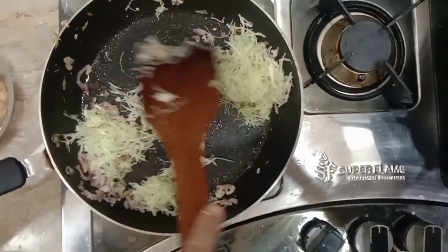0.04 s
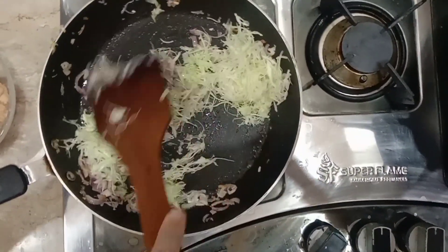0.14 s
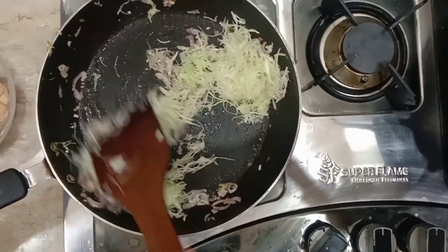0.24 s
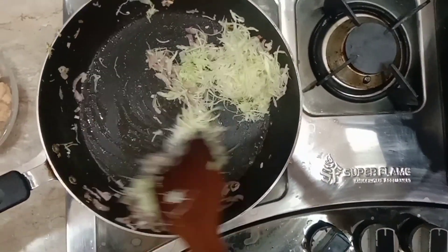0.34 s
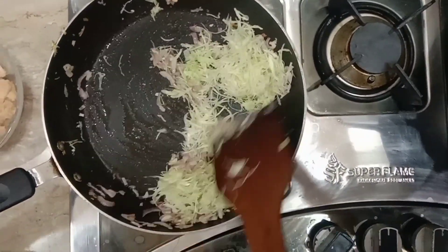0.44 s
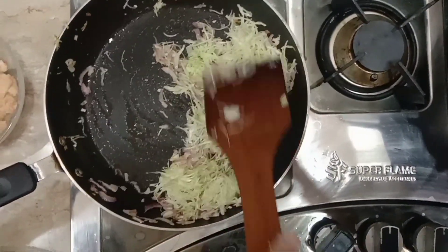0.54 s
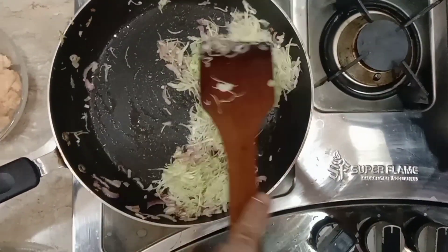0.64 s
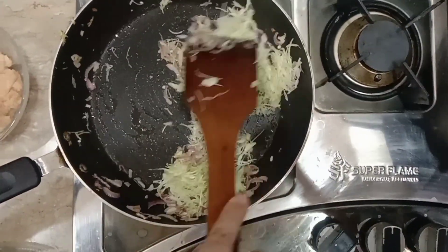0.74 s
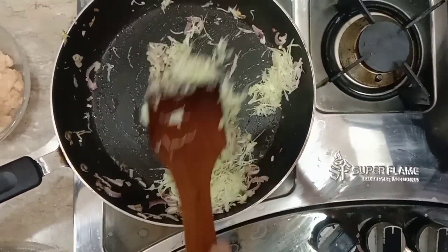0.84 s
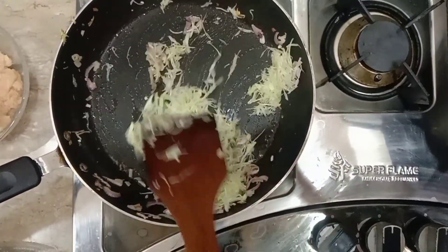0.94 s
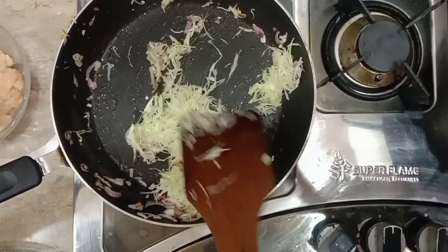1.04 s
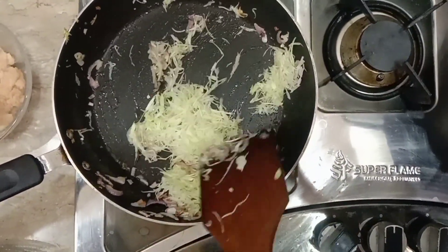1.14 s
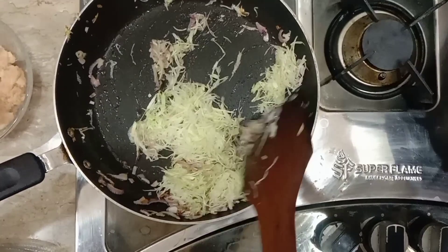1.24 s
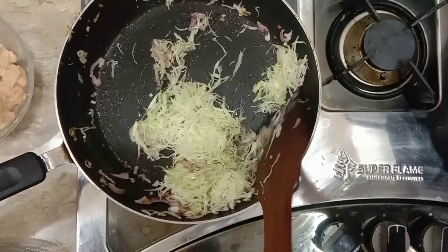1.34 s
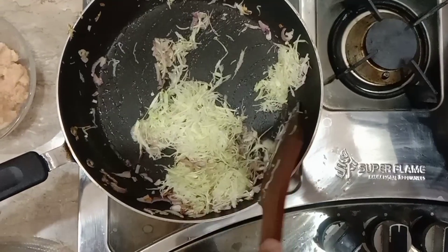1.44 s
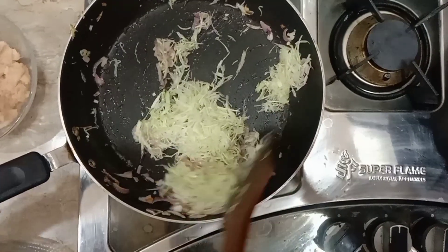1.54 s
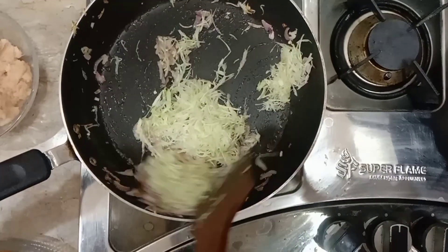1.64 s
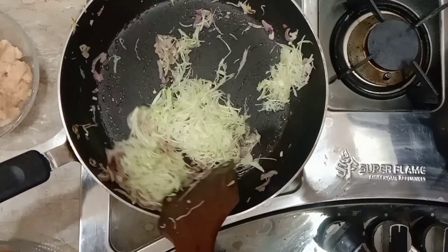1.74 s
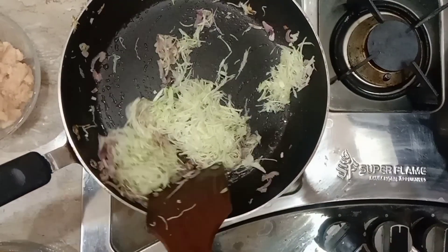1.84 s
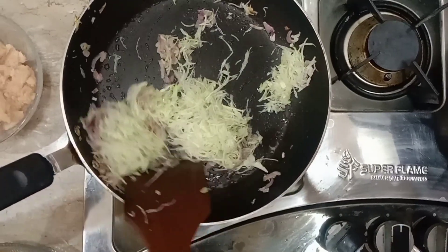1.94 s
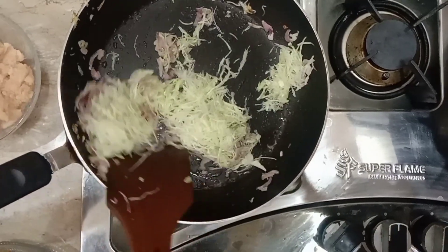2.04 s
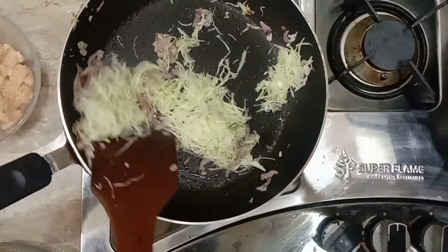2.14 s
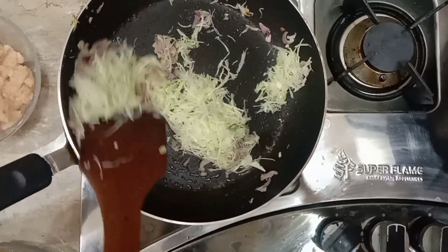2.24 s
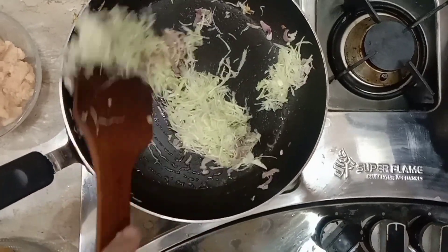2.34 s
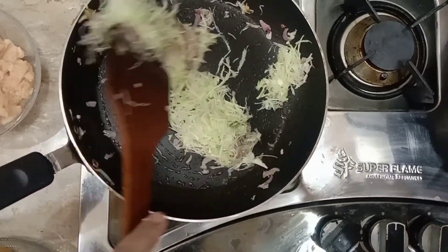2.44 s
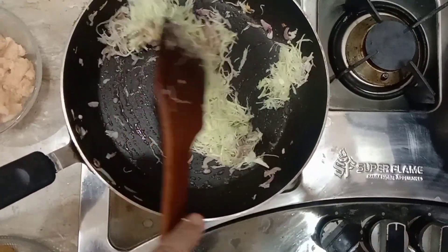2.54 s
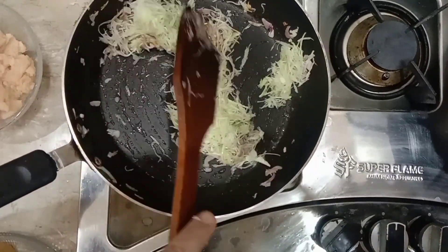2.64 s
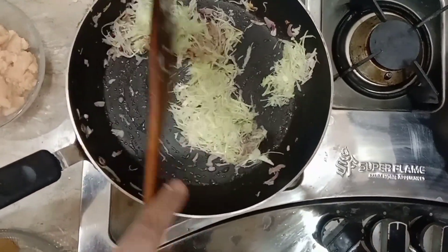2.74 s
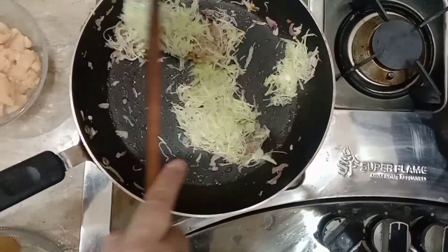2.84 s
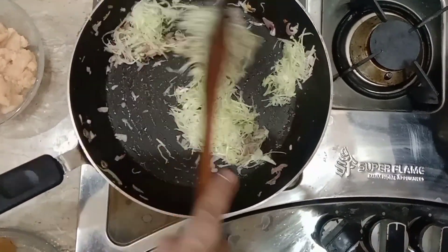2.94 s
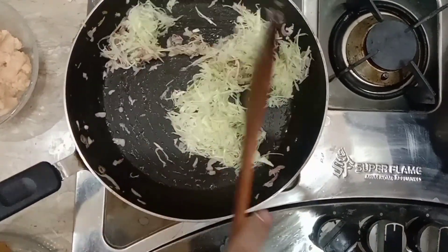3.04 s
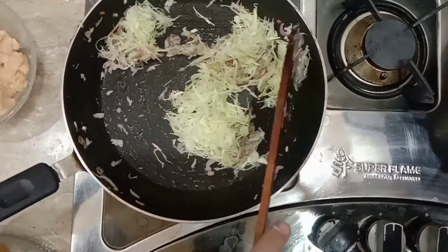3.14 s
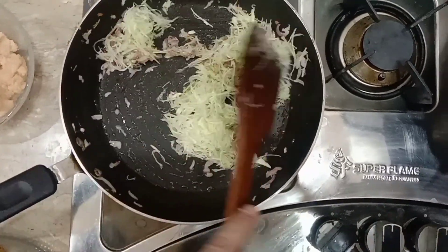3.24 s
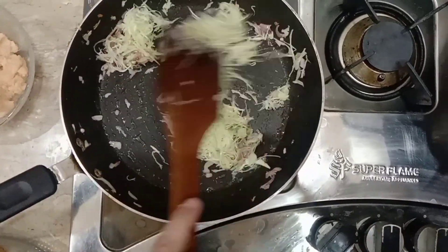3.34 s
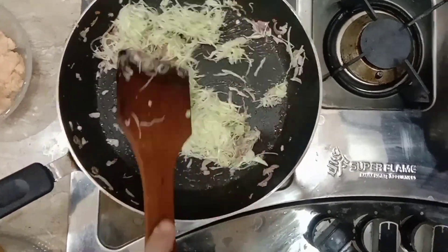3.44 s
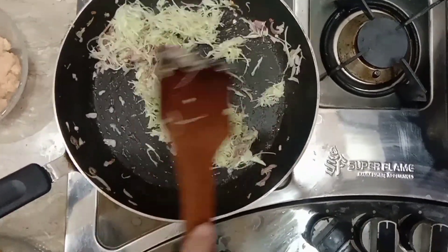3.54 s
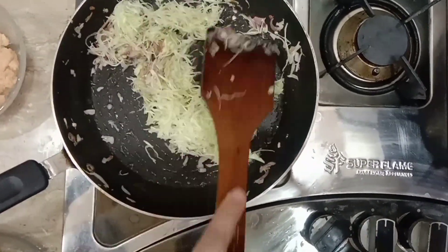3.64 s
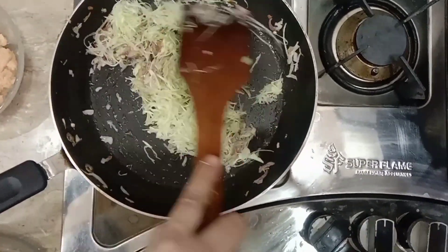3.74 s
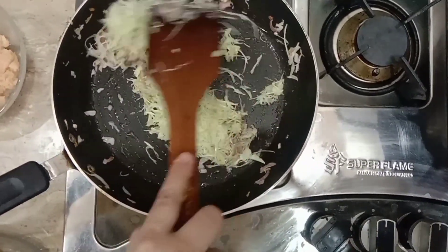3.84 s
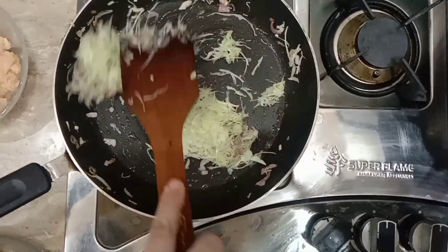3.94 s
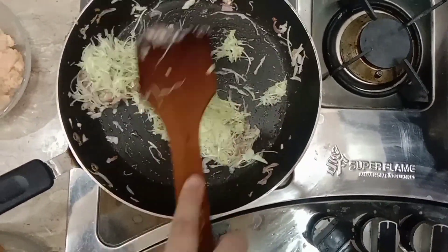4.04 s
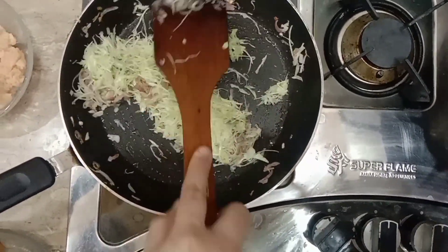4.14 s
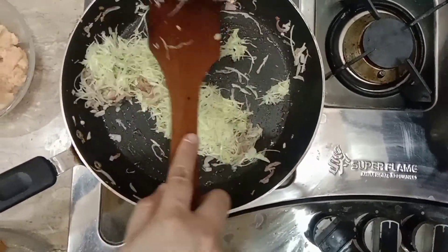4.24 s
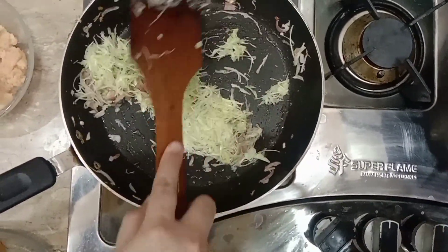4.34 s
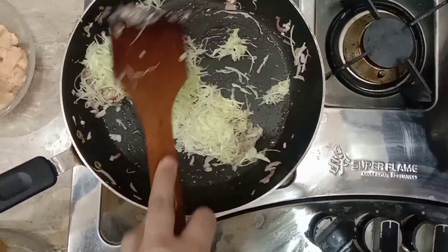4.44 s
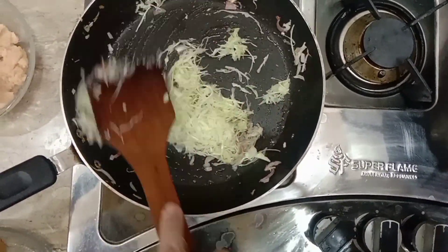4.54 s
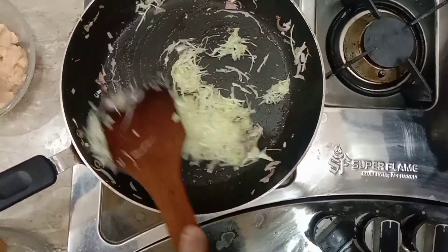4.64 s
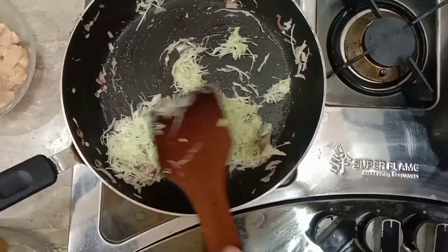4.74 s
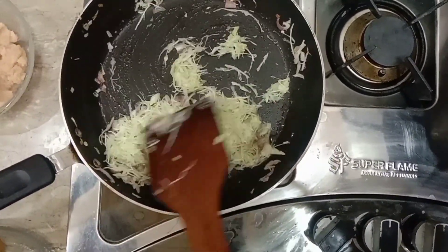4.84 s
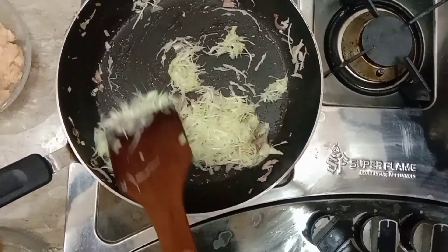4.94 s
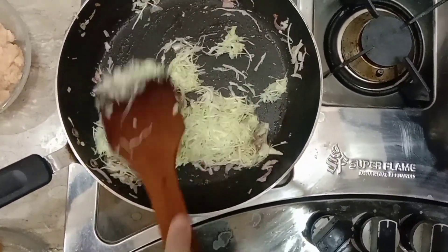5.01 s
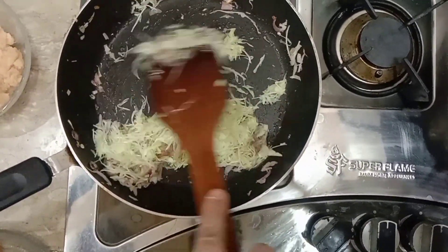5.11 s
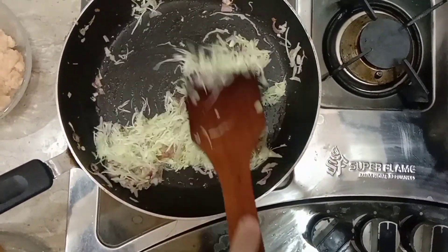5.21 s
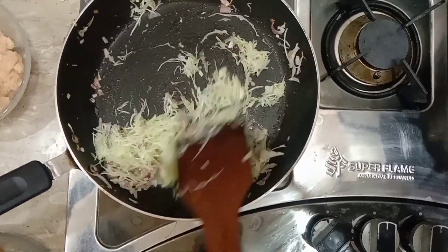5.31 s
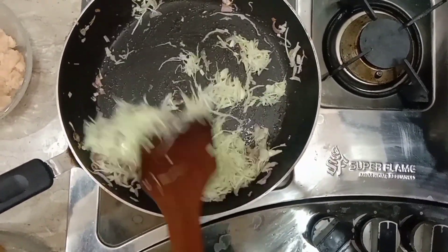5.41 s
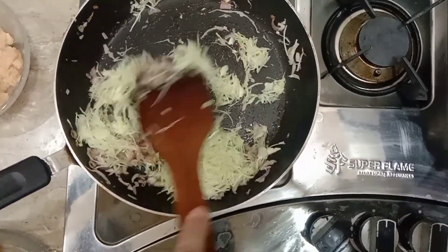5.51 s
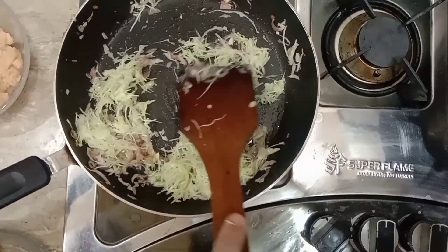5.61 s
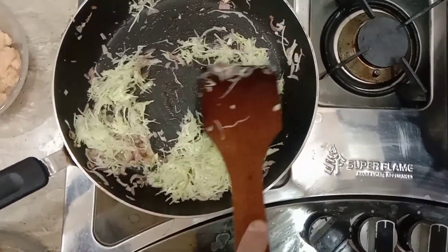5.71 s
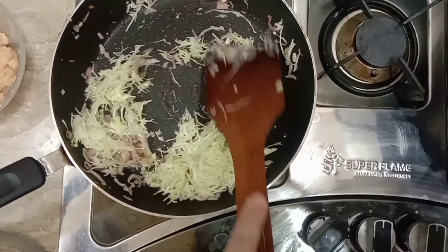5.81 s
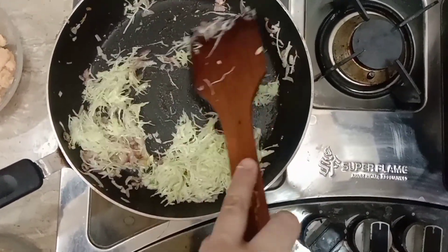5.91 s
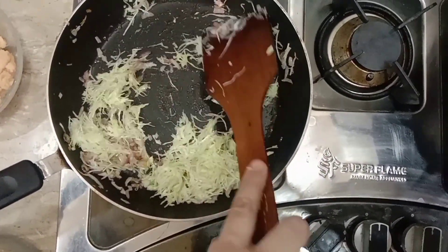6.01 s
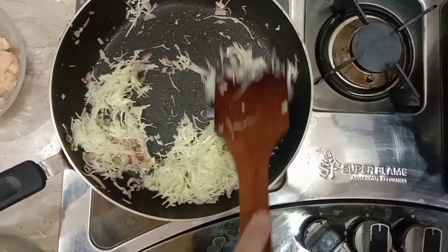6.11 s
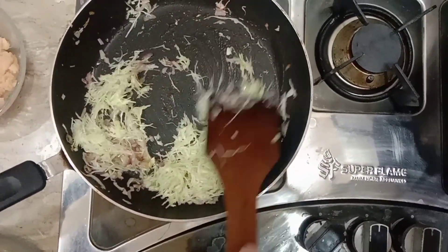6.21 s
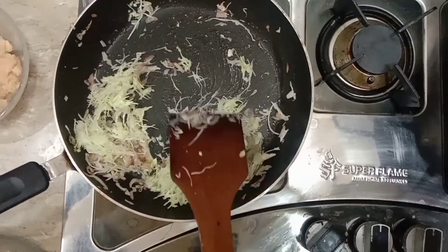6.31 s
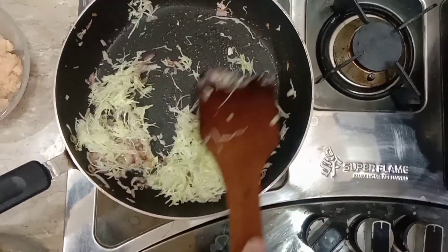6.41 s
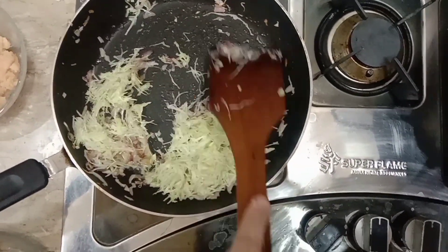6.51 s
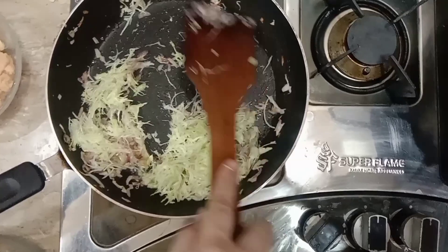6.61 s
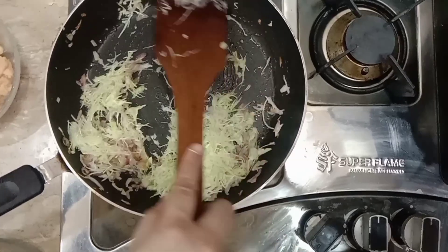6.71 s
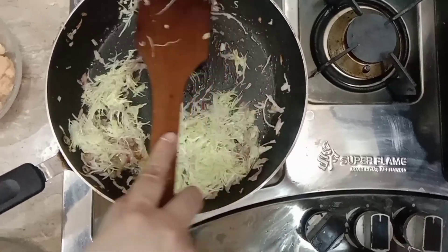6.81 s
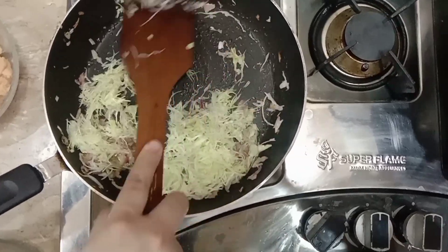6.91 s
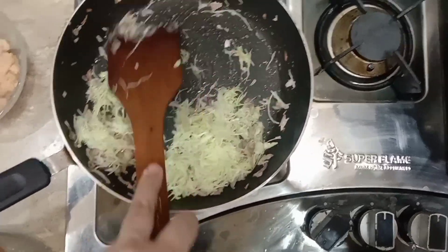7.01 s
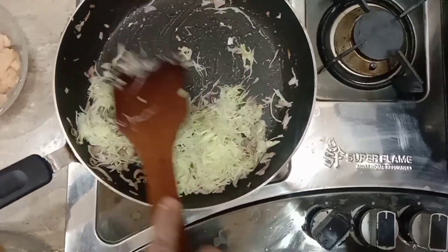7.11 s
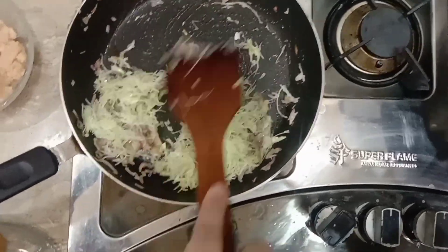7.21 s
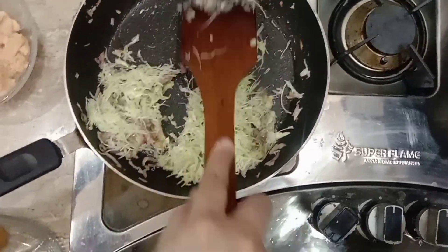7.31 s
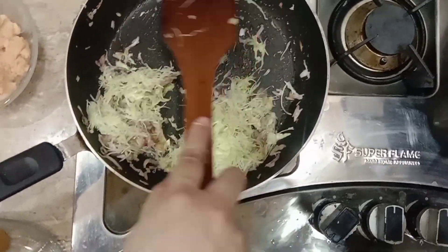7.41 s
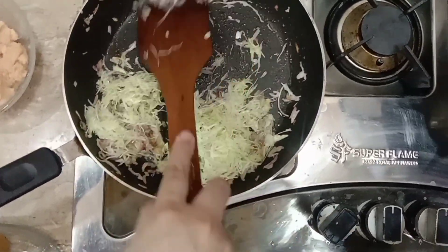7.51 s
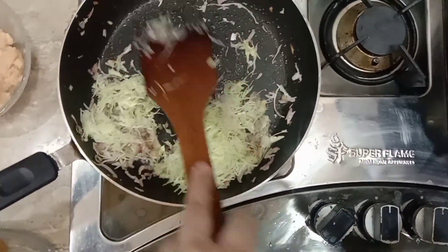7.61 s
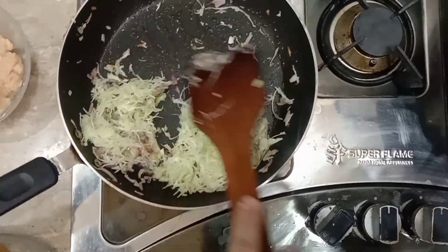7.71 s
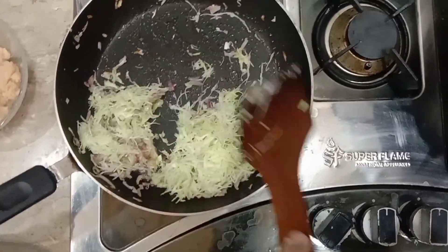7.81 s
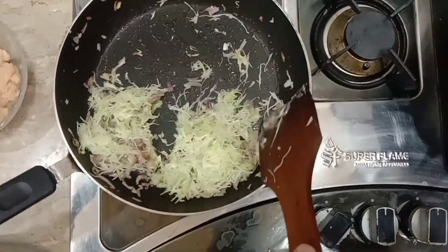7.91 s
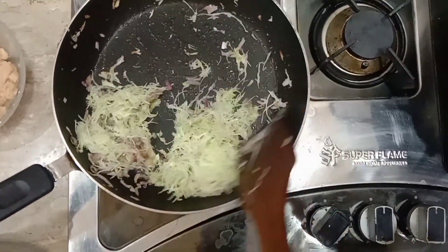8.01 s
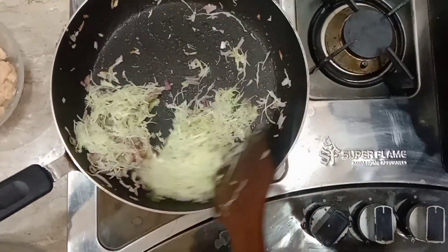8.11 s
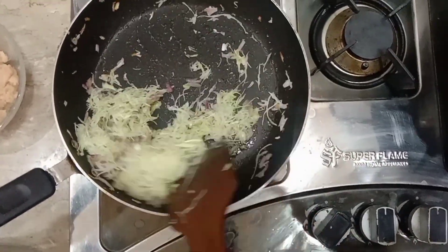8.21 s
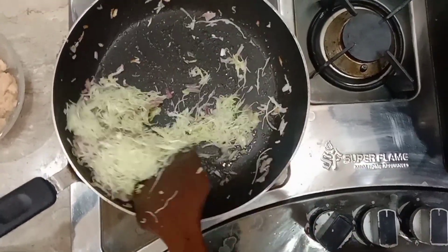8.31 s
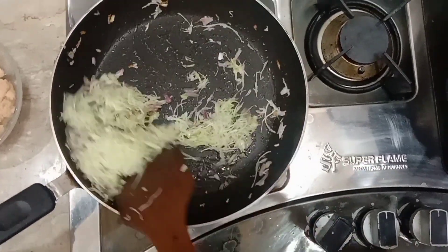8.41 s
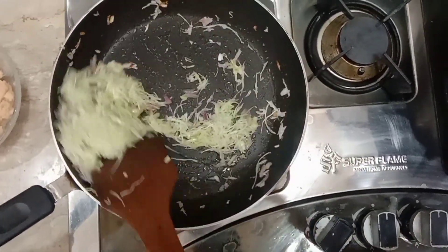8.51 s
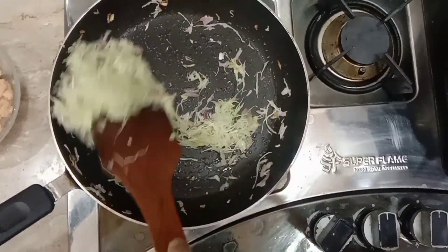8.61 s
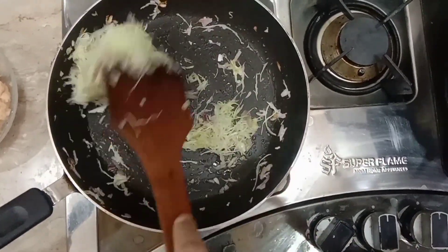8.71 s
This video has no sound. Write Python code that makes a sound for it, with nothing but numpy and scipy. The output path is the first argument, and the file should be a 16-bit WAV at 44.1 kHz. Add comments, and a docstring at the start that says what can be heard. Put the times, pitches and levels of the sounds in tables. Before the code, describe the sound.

Shredded vegetables fry in a coated pan, heard close through a mono phone microphone in a small kitchen. At first only a thin, quiet hiss and faint low rumble. A dull bump comes at 0.55 s, a hollow wooden knock at 0.85, scraping around 1.0 to 1.4, and soft bumps near 1.6. A hard, ringing cluster of taps lands from 2.4 to 2.6. Just before 3 s a broad crackle rises, swelling unevenly through 4 to 5.7 s, with light taps at 3.1 and 3.6 and a firmer knock at 5.4. Around 5.9 s a bright, much louder fizz bursts in and holds, sputtering, with spits near 6.5 and 7.6. A sharp tap rings at 6.1, others at 6.9, 7.3 and 7.6, with dry scrapes from 7.3 to 7.8. The fizz dips near 8.35, surges at 8.6 beside a dull bump, and continues to the end at 8.8.

```python
"""Vegetables frying in a pan

Shredded vegetables fry in a coated pan in a small kitchen, close under a mono phone microphone.
Steam bubbles burst in the oil: patchy noise for a fine hiss, a broad crackle and, later, a bright fizz.
A wooden spatula taps, bumps and scrapes: decaying sines and noise slips ring the pan on its grate.
A low rumble lies beneath; the phone's noise suppressor cuts the bass tails short, band by band."""
import sys
import numpy as np
from scipy import signal
from scipy.fft import rfft, irfft, next_fast_len
from scipy.io import wavfile
from scipy.ndimage import uniform_filter1d, map_coordinates

SR = 44100
rng = np.random.default_rng(int(sys.argv[2]) if len(sys.argv) > 2 else 0)


def to_wav(s):
    """Save 16-bit WAV."""
    ch = np.atleast_2d(s).T  # columns
    pcm = np.round(np.clip(ch, -1, 1) * 32767)  # PCM
    wavfile.write(sys.argv[1], SR, pcm.astype(np.int16))


N = 386316


def amp(db):
    """Decibels to gain."""
    return 10 ** (np.asarray(db) / 20)


def unit(x):
    """Scale to rms 1."""
    return x / np.sqrt(np.mean(x ** 2) + 1e-20)


def peak(x):
    """Scale to peak 1."""
    return x / np.abs(x).max()


def along(points, hz):
    """Interpolate (Hz, value) points on a log frequency axis."""
    point_hz, values = np.transpose(points)
    return np.interp(np.log(hz + 1), np.log(point_hz + 1), values)


def curve(rows):
    """Interpolate (s, dB) rows to one value per sample; -150 dB ahead of the first, the last one held."""
    s, level_db = np.transpose(rows)
    return np.interp(np.arange(N) / SR, s, level_db, left=-150)


def wobble(knots_per_s):
    """A smooth random curve through normally distributed knots."""
    knots = rng.standard_normal(int(N * knots_per_s / SR) + 4)
    return map_coordinates(knots, [np.arange(N) * knots_per_s / SR])


def filtered(x, response):
    """Multiply the spectrum of x by a response of frequency."""
    m = next_fast_len(N + SR // 2)
    return irfft(rfft(x, m) * response(np.fft.rfftfreq(m, 1 / SR)), m)[..., :N]


def below(x, edge_hz, width_hz):
    """The part of x under an edge; the gain falls linearly to 0 over the width."""
    return filtered(x, lambda hz: np.clip((edge_hz - hz) / width_hz, 0, 1))


def bursts(spectrum, spike_db, patchy_db):
    """Dense bursts of exponentially scattered size, in time-frequency patches, coloured, at rms 1."""
    sizes = np.minimum(rng.exponential(size=N), 6)
    z = signal.stft(rng.standard_normal(N) * amp(spike_db * sizes), nperseg=512)[2]
    field = uniform_filter1d(rng.standard_normal(z.shape), size=2, axis=0)
    field = uniform_filter1d(field, size=22, axis=1)
    patched = signal.istft(z * amp(patchy_db * unit(field)), nperseg=512)[1][:N]
    return unit(filtered(patched, lambda hz: amp(along(spectrum, hz))))


def echo():
    """A fresh kitchen tail of unit energy: noise in which each frequency dies at its own speed."""
    # Each row: frequency in Hz, t60 in s.
    decay_t60 = [(120, 0.25), (500, 0.63), (1500, 0.4), (4000, 0.074)]
    hz, t, z = signal.stft(rng.standard_normal(SR // 2), SR, nperseg=256)
    decay = amp(-60 * t / along(decay_t60, hz)[:, None])
    tail = signal.istft(z * decay, SR, nperseg=256)[1]
    return tail / np.linalg.norm(tail)


def ringing(bass_db, treble_db, spread_db):
    """The pan's answer to one blow: decaying modes, bass and treble weighted by where it lands."""
    # Modes of pan and grate. Each row: frequency in Hz, level in dB, t60 in s.
    pan_modes = [(109.3, -7.5, 0.36), (127.2, -11, 0.97), (172.8, 2, 0.17), (198.3, 3, 0.12),
                 (218, 1.5, 0.2), (303.5, -6, 0.36), (335.7, 0.5, 0.11), (399.5, -3, 0.25),
                 (444.8, 0, 0.22), (464.3, -2, 0.33), (501.6, 2.5, 0.2), (562, 1, 0.12), (556, -12, 0.033),
                 (689, 0, 0.049), (844, -2.5, 0.17), (896, 0, 0.067), (979, -3, 0.18), (1053, 14, 0.041),
                 (1100, -8.5, 0.43), (1253, -3, 0.19), (1280, -8, 0.062), (1324, -10, 0.045),
                 (1736, -5.5, 0.059), (2040, -10, 0.051)]
    t = np.arange(SR // 2) / SR
    hz, level_db, t60_s = np.transpose(pan_modes)[:, :, None]
    weight_db = along([(250, bass_db), (330, 0.0056), (650, 0.0076), (900, treble_db)], hz)
    level_chance, phase_chance = rng.standard_normal((2, len(pan_modes), 1))
    envelope = amp(level_db + weight_db + spread_db * level_chance - 60 * t / t60_s)
    modes = envelope * np.sin(2 * np.pi * hz * t + 0.4 * phase_chance)
    return modes.sum(0) * (1 - np.exp(-t / 0.00079))  # soft onset


def rumble():
    """Low kitchen rumble: coloured noise under a slow level curve."""
    # Each row: time in seconds, level in dB.
    level_rows = [(0.0, -50.5), (3.0, -52.5), (3.6, -52.5), (6.2, -52.5), (8.76, -52)]
    # Spectral shape. Each row: frequency in Hz, relative density in dB.
    shape = [(15, -65), (25, -29), (113, -12), (262, -24.5), (340, -18.5), (518, -24.5), (800, -19),
             (1040, -35), (1760, -120)]
    return amp(curve(level_rows)) * bursts(shape, spike_db=0, patchy_db=1.2)


def bumps():
    """Dull pushes that hardly ring: two damped sines each, with a weak answer of the kitchen."""
    # Each row: start in seconds, peak in dB, pitch in Hz, t60 in s.
    pushes = [(0.486, -37, 335, 0.037), (0.552, -20, 390, 0.011), (1.271, -27.5, 350, 0.017),
              (1.624, -29, 290, 0.035), (1.643, -22.5, 293, 0.019), (2.924, -33, 147, 0.044),
              (4.95, -43.5, 584, 0.21), (7.981, -39, 564, 0.27), (8.682, -24, 313, 0.0087),
              (8.69, -40, 69, 0.13)]
    out, t = np.zeros(N + SR), np.arange(SR // 8) / SR
    for start_s, peak_db, hz, t60_s in pushes:
        push = np.sin(2 * np.pi * hz * t) + 0.22 * np.sin(2 * np.pi * 1.2 * hz * t)
        envelope = amp(-60 * t / t60_s) * (1 - np.exp(-t / 0.002))
        out[round(start_s * SR):][:len(t)] += amp(peak_db) * peak(envelope * push)
    return out[:N] + amp(-30.5) * signal.fftconvolve(out, echo())[:N]


def scrapes():
    """Fine slips of the wooden edge excite the pan modes; each stroke bites, fades and lifts off."""
    # Each row: start in seconds, length in s, first level in dB, bass in dB, treble in dB;
    # bass and treble are relative to the middle band.
    strokes = [(1.015, 0.22, -43.5, -12, -15), (1.24, .21, -47.5, -17, -3), (3.23, 0.12, -53.5, -16, -2),
               (3.788, 0.15, -46.5, -17, -0.5), (5.473, 0.12, -42, -16, -6), (6.327, 0.18, -45.5, -10, -18),
               (6.93, 0.12, -46.5, -1, -12), (7.322, 0.238, -41, 6, -3), (7.547, 0.073, -36, -12, -26),
               (7.624, 0.22, -36.5, -1.5, -5), (8.469, 0.08, -53.5, 5.5, -22)]
    attack_s, release_s, fade_db_per_s = 0.011, 0.01, 60
    slip_spread_db = 4
    slips = rng.standard_normal(N) * amp(slip_spread_db * wobble(40))
    rubbed = signal.fftconvolve(slips, ringing(bass_db=0, treble_db=0, spread_db=0))[:N]
    low, dull = below(rubbed, 430, 80), below(rubbed, 533, 96)
    bass, middle = unit(low), unit(dull - low)
    treble = unit(below(rubbed, 1150, 240) - dull)
    out = np.zeros(N)
    for start_s, length_s, first_db, bass_db, treble_db in strokes:
        t = np.arange(N) / SR - start_s
        contact = np.clip(np.minimum(t / attack_s, (length_s - t) / release_s), 0, 1) ** 2
        stroke = contact * amp(first_db - fade_db_per_s * np.clip(t, 0, length_s))
        out += stroke * (amp(bass_db) * bass + middle + amp(treble_db) * treble)
    return out


def taps():
    """Every tap cracks, rings the pan and rattles it on the grate; the kitchen answers."""
    # Each row: start in seconds, ring peak in dB, bass in dB, treble in dB, rattle in dB, crack in dB;
    # bass and treble weight the modes, the rattle is relative to the blow, the crack to the ring.
    tap_rows = [(0.593, -34.5, -1, -13, -38, -9), (0.607, -55, -9, -15, -41, -15),
                (0.828, -24.5, -7.5, -5.5, -34.5, -24), (0.85, -20, 10, 5, -36.5, -5),
                (0.862, -35, -12, -3, -49, 4.5), (1.209, -33.5, 16, -12, -32, -11),
                (1.25, -32.5, 3.5, -7, -38, -10), (2.432, -21.5, 1, 1, -25.5, -6),
                (2.472, -15, 3.5, 6, -33, -9.5), (2.491, -24, 8, 3, -41, -6), (2.513, -24, 0.5, 9, -47, -4),
                (2.597, -21.5, 4, 2.5, -48, -9), (2.817, -40, 13, -7, -31, -6), (2.9, -40.5, 6, -5, -48, 1),
                (3.128, -32.5, 5, -13, -38.5, -20), (3.63, -29.5, -0.8, -6, -26, -20),
                (5.393, -21, -3.5, -11, -34.5, -8), (6.07, -33.5, -1, -9, -28, -15),
                (6.11, -16, -6.5, 6, -39, -4), (6.229, -22, -5, -5, -46, -17),
                (6.875, -24, -1, -7, -44.5, -12), (7.276, -20.5, -2.5, 2.5, -44, -20),
                (7.627, -24.5, -13, -1, -35, -21), (8.47, -41.5, 2.7, -9, -24, -16)]
    crack_t60_s, rattle_t60_s = 0.047, 0.31
    mode_spread_db, kitchen_db = 3, -9.5
    out, t = np.zeros(N + 2 * SR), np.arange(SR // 4) / SR
    woody = signal.butter(3, [600, 2000], "band", fs=SR, output="sos")
    soft = signal.butter(2, 550, fs=SR, output="sos")  # the rattle is gentler than the blow
    for start_s, peak_db, bass_db, treble_db, rattle_db, crack_db in tap_rows:
        uneven = rng.standard_normal(len(t)) * amp(6 * rng.standard_normal(len(t)))
        blows = amp(rattle_db - 60 * t / rattle_t60_s) * signal.sosfilt(soft, uneven)
        blows[0] = 1  # the tap itself
        ring = peak(signal.fftconvolve(blows, ringing(bass_db, treble_db, mode_spread_db)))
        crack = signal.sosfilt(woody, amp(-60 * t / crack_t60_s) * rng.standard_normal(len(t)))
        ring[:len(t)] += amp(crack_db) * peak(crack)
        heard = amp(kitchen_db) * signal.fftconvolve(ring, echo())
        heard[:len(ring)] += ring
        out[round(start_s * SR):][:len(heard)] += amp(peak_db) * heard
    return out[:N]


def sizzle():
    """Small bubbles hiss, larger ones crackle and fizz; all sputter a little together."""
    # Small bubbles, wet vegetables on hot metal, water boiling off hard.
    # Each row: time in seconds, level in dB.
    hiss_rows = [(0.0, -48), (0.22, -47), (0.44, -51.5), (0.78, -51), (0.9, -50), (1.5, -49), (2.15, -51.5),
                 (2.55, -48), (2.95, -50.5), (3.76, -50), (4.6, -47), (5.4, -44.5), (5.8, -47.5),
                 (6.1, -47.5), (7.1, -42.5), (7.9, -46.5), (8.2, -40), (8.76, -37.5)]
    crackle_rows = [(0.0, -53), (0.14, -46.5), (0.41, -55), (1.46, -53.5), (2.27, -58), (2.88, -54.5),
                    (2.95, -42), (3.39, -38.5), (3.46, -44), (3.75, -42), (4.1, -36), (4.24, -41),
                    (4.42, -34.5), (4.66, -35.5), (4.75, -32.5), (4.92, -32), (5.07, -36.5), (5.27, -33.5),
                    (5.37, -37.5), (5.54, -31.5), (5.66, -31), (5.76, -39.5), (5.93, -36), (6.49, -36.5),
                    (6.9, -43.5), (7.59, -35.5), (8.2, -41), (8.76, -42.5)]
    fizz_rows = [(5.75, -59), (5.9, -39), (5.94, -27.5), (6.02, -26), (6.31, -28), (6.5, -25.5), (6.6, -27),
                 (7.46, -27), (7.6, -27.5), (8.06, -26), (8.35, -30), (8.61, -22.5), (8.76, -27.5)]
    # Spectral shapes of hiss, top hiss, crackle and fizz. Each row: frequency in Hz, relative density in dB.
    fine_shape = [(800, -62), (1300, -3.5), (2500, -4.5), (4000, 0.5), (5700, -4), (6200, -11.5),
                  (9400, -17.5), (11400, -20.5), (13000, -23)]
    top_shape = [(9000, -33), (11300, -20), (12500, -5.5), (14000, -6.5), (15750, -5.5)]
    broad_shape = [(440, -33), (750, -23), (1110, -3.5), (2030, -1), (2390, 0), (3470, -1.5), (4910, -24),
                   (5580, -19.5), (9190, -25.5), (12000, -32.5), (15600, -70), (22000, -120)]
    bright_shape = [(1060, -26), (1800, -15), (2030, -16.5), (2410, -6.5), (3480, 4.5), (3770, 2.5),
                    (4890, -30), (5510, -21.5), (9160, -31.5), (9920, -29), (12000, -34.5), (15600, -63),
                    (22000, -120)]
    # Drops that spit in the oil. Each row: centre in seconds, peak in dB, length in s (full width at 1/e power).
    spit_rows = [(3.921, -36.5, 0.023), (6.39, -26, .03), (6.51, -24.5, 0.067), (7.556, -27, 0.06),
                 (7.743, -33, 0.028), (8.382, -27, 0.017)]

    t = np.arange(N) / SR
    hiss_db, crackle_db, fizz_db = curve(hiss_rows), curve(crackle_rows), curve(fizz_rows)
    sputter = wobble(11)

    fine = amp(hiss_db + 0.46 * sputter) * bursts(fine_shape, spike_db=1.9, patchy_db=2.3)

    top_mean_db, top_follows = -53, 0.34  # share of the hiss's swings that the top takes
    top_db = top_mean_db + top_follows * (hiss_db - hiss_db.mean()) + 0.8 * wobble(5)
    top = amp(top_db + 0.7 * sputter) * bursts(top_shape, spike_db=1.5, patchy_db=1.8)

    # The largest bubbles sound lowest; they sink once the water boils hard.
    large_lift_db, large_drowned_db = 6, -15
    boiling = np.minimum(amp(fizz_db - crackle_db), 1)
    large_db = large_lift_db + large_drowned_db * boiling + 2.4 * wobble(6)
    crackle = bursts(broad_shape, spike_db=2.5, patchy_db=2.5)
    crackle = crackle + (amp(large_db) - 1) * below(crackle, 1000, 230)
    broad = amp(crackle_db + 0.4 * sputter + 0.4 * wobble(60)) * crackle

    # Fizz and spits add as power.
    spit_power = sum(amp(2 * peak_db) * np.exp(-(2 * (t - centre_s) / length_s) ** 2)
                     for centre_s, peak_db, length_s in spit_rows)
    fizz_power = amp(2.008 * (fizz_db + 0.22 * sputter + 0.51 * wobble(60)))
    fizz_gain = np.sqrt(fizz_power + spit_power)
    bright = fizz_gain * bursts(bright_shape, spike_db=2.5, patchy_db=2.0)
    return fine + top + broad + bright


def scene():
    """The pan is too small to radiate deep bass; one microphone feeds both channels."""
    no_deep_bass = signal.butter(3, 90, "high", fs=SR, output="sos")
    pan = signal.sosfilt(no_deep_bass, scrapes() + taps())
    return np.tile(rumble() + bumps() + pan + sizzle(), (2, 1))


def record(dry):
    """The suppressor turns down each band near its threshold; then port colour and band limit."""
    # Suppressor threshold. Each row: frequency in Hz, level in dB per band.
    thresholds = [(100, -58), (500, -62), (800, -61.5), (1100, -78), (2800, -70), (4000, -77), (6500, -102),
                  (9000, -120)]
    # Dips of the microphone port. Each row: centre in Hz, width in Hz, gain in dB.
    port_dips = [(9160, 410, -2.5), (11270, 240, -2)]
    floor_db, top_hz = -18, 15720
    hz, _, z = signal.stft(dry, SR, nperseg=512, noverlap=384)
    power = uniform_filter1d(np.abs(z) ** 2, size=2, axis=1)
    power = uniform_filter1d(power, size=17, axis=2, origin=7)  # averaged mostly over past frames
    threshold_power = amp(along(thresholds, hz))[:, None] ** 2
    gain = np.clip(1 - threshold_power / (np.abs(power) + 1e-20), amp(floor_db), 1)
    kept = signal.istft(z * gain, SR, nperseg=512, noverlap=384)[1][:, :N]

    def port(f):
        """Gaussian dips in dB, cut off above the band limit."""
        dips_db = sum(db * np.exp(-((f - centre) / width) ** 2) for centre, width, db in port_dips)
        return amp(dips_db) * (f < top_hz)

    return filtered(kept, port)


dry = scene()
out = record(dry)
to_wav(out)
```